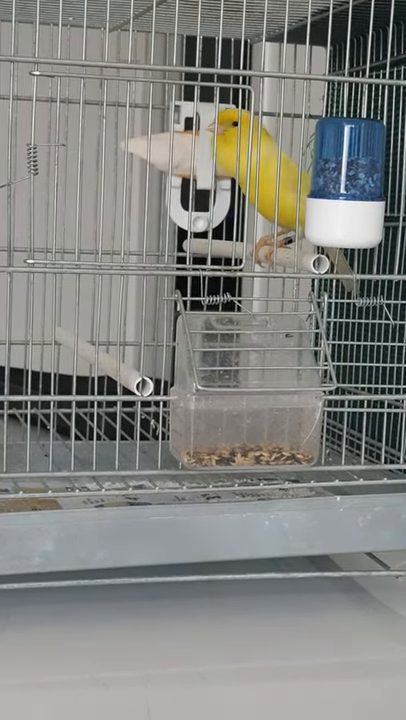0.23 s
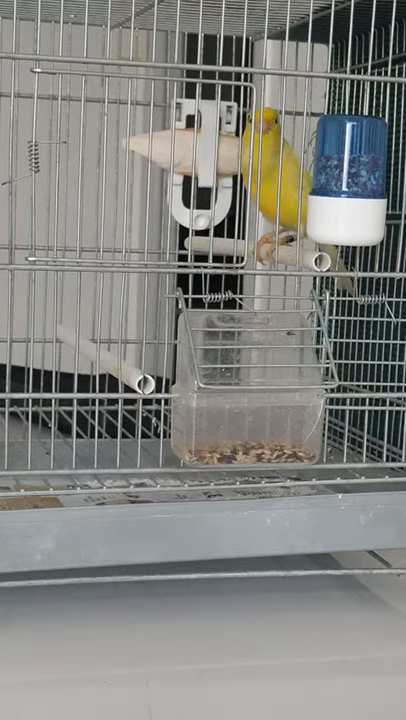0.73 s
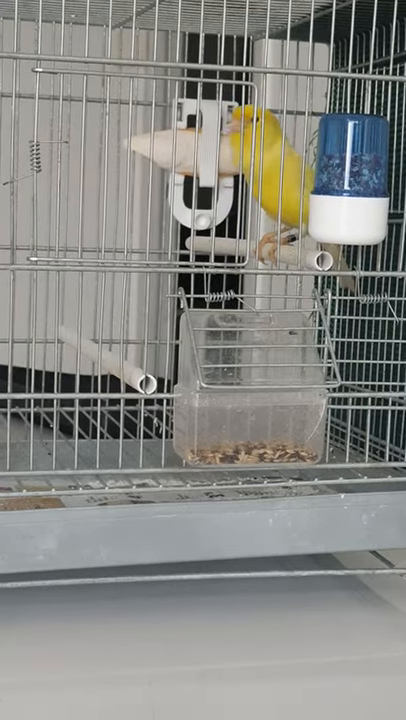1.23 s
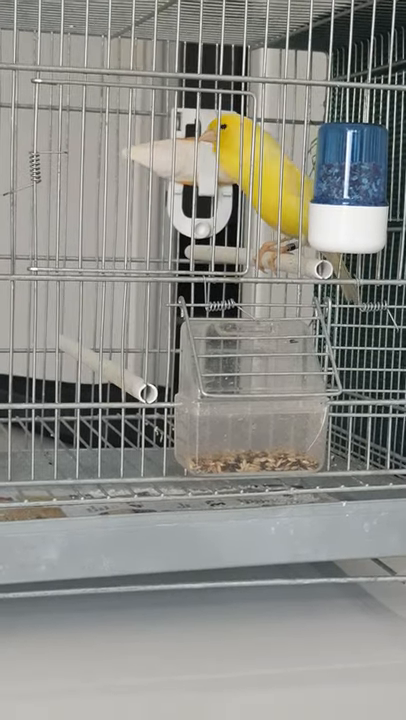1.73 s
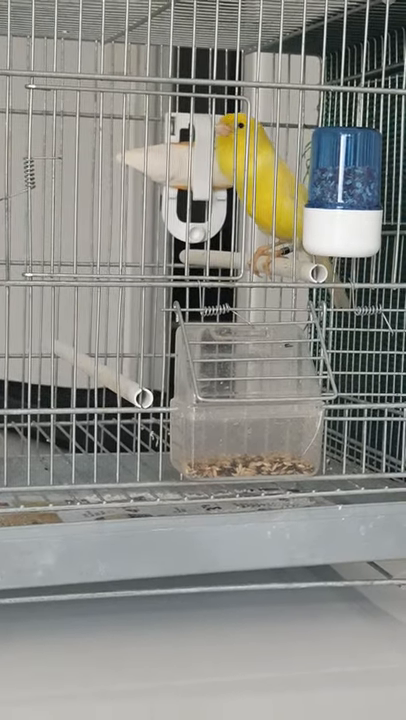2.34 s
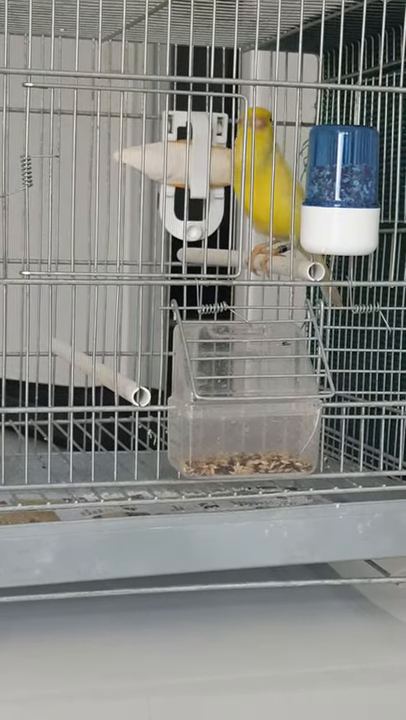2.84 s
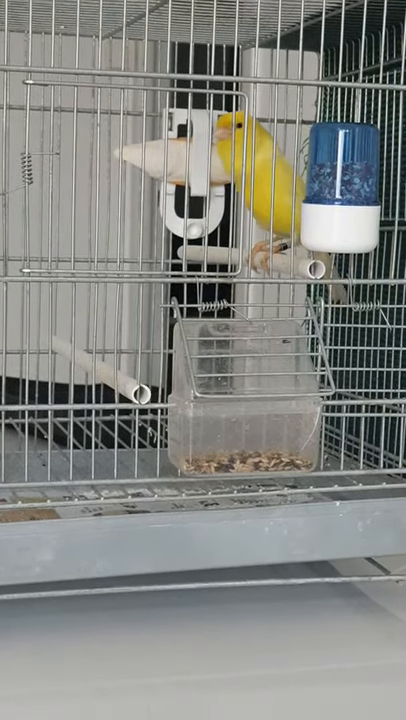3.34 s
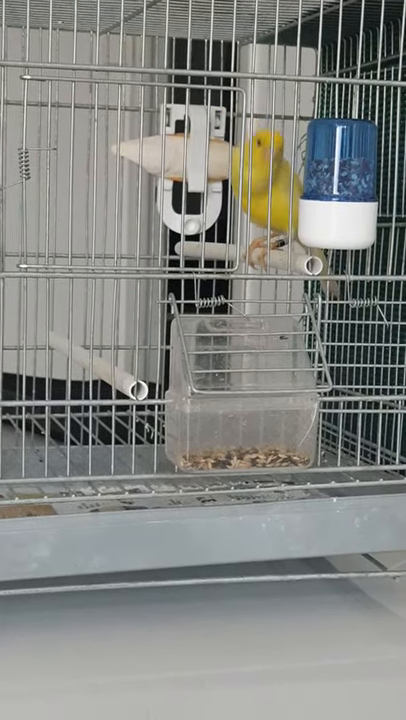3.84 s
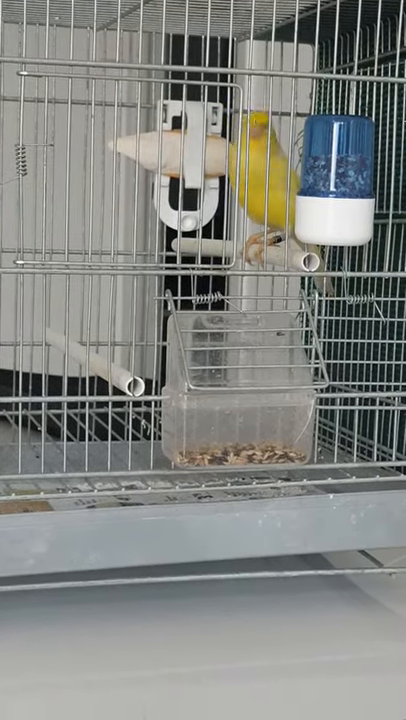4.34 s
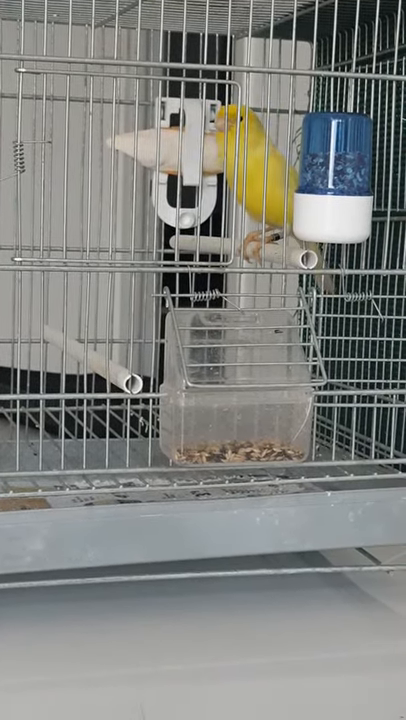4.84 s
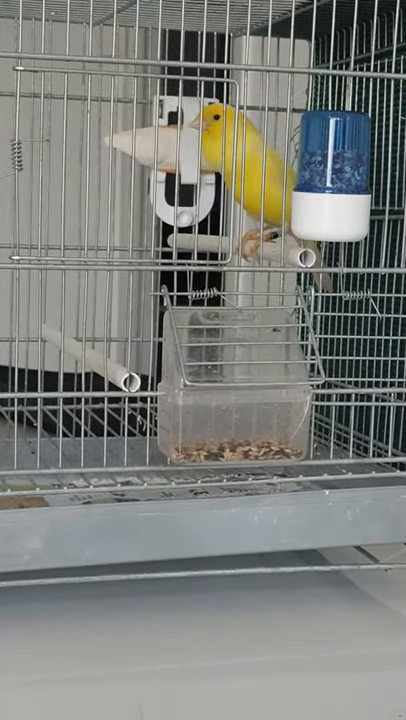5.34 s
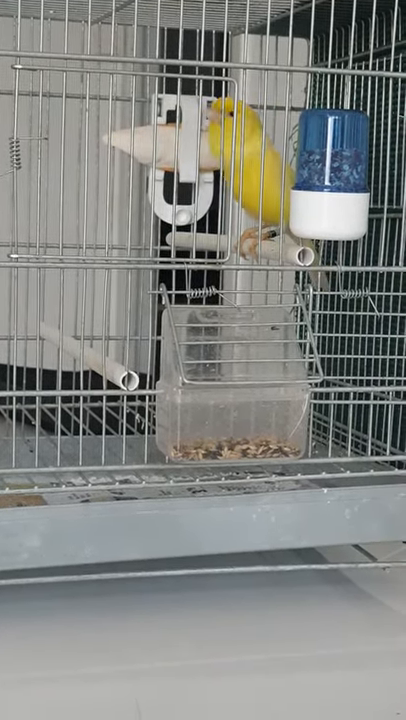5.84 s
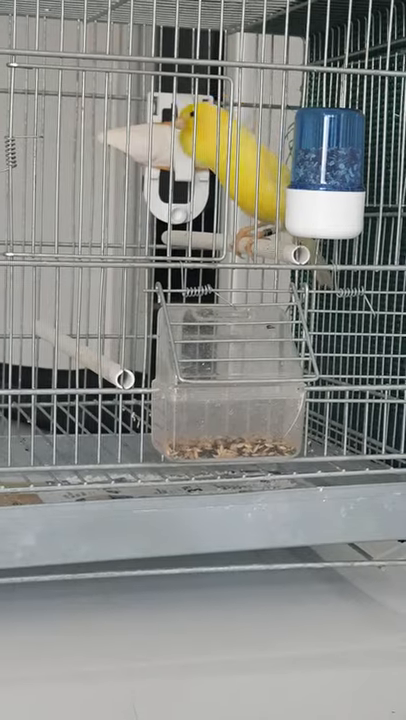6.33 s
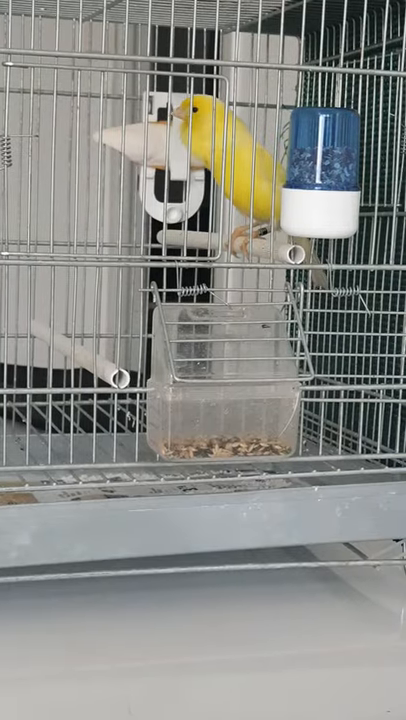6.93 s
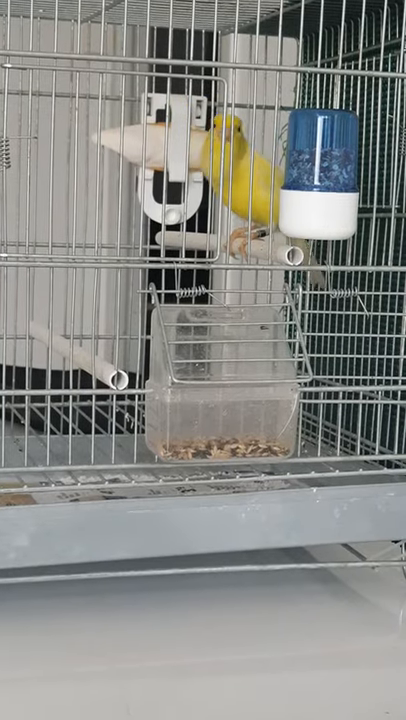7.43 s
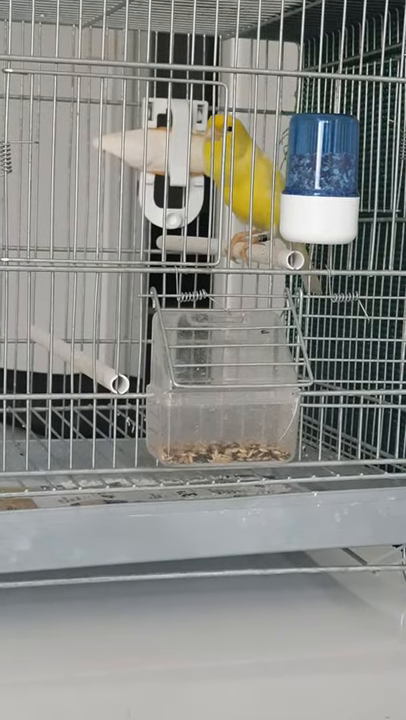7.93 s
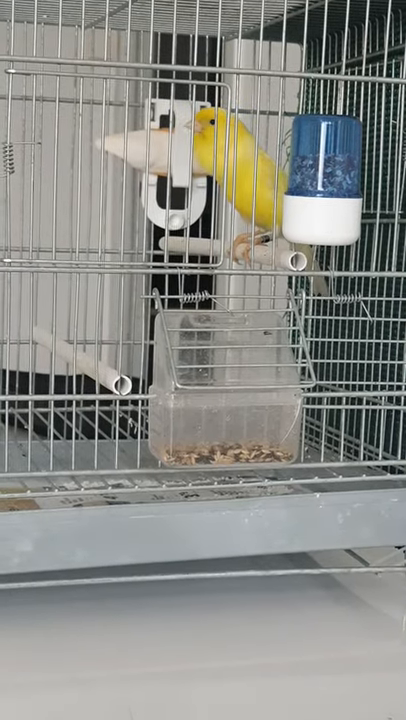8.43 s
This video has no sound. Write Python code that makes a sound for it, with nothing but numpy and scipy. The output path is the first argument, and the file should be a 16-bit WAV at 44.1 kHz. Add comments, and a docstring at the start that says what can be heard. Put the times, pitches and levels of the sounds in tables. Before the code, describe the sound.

A canary sings in a wire cage, close to the microphone in a small hard-walled room. A brief raspy note leads to three loud, sharp chirps, then three falling whistles, each answered by a soft low hoot. A fast roll swells, followed by quieter clucks, a bubbling warble and a long fluttering whistle. A few small cage knocks and faint room air lie beneath.

```python
"""A canary sings in its wire cage in a small hard-walled room, close to a pair of microphones.
One whistling voice, a swept sine with overtones, plays every phrase: a raspy held note, three sharp chirps,
three falling slurs answered by low hoots, a fast roll, clucks, a bubbling warble and a long fluttering whistle.
Small knocks and soft rumbles of filtered noise, still air and a faint hum lie beneath."""
import sys
import numpy as np
from scipy import signal
from scipy.fft import rfft, irfft, next_fast_len
from scipy.io import wavfile
from scipy.ndimage import uniform_filter1d

SR = 44100
rng = np.random.default_rng(int(sys.argv[2]) if len(sys.argv) > 2 else 0)


def pcm_store(signal):
    """Save signal as 16-bit PCM."""
    levels = np.round(np.clip(np.atleast_2d(signal), -1, 1) * 32767)
    wavfile.write(sys.argv[1], SR, levels.astype(np.int16).T)


N = 382788
TIME = np.arange(N) / SR
SIZE = next_fast_len(N + SR)
FREQS = np.maximum(np.arange(SIZE // 2 + 1) * SR / SIZE, 1)


def from_db(db):
    """Decibels to gain."""
    return 10 ** (np.asarray(db) / 20)


def rms_one(x):
    """Scale to unit power."""
    return x / np.sqrt(np.mean(x ** 2) + 1e-20)


def at_hz(points, hz, axis=1):
    """Read one column of a table on a log-frequency axis."""
    table = np.array(points)
    return np.interp(np.log(hz), np.log(table[:, 0]), table[:, axis])


def at_time(points, t):
    """Read a two-column table at the times t."""
    return np.interp(t, *np.transpose(points))


def band(x, low_hz, high_hz):
    """Causal band-pass."""
    sos = signal.butter(2, [low_hz, min(high_hz, .45 * SR)], "band", fs=SR, output="sos")
    return signal.sosfilt(sos, x)


def drift(t, rate_hz):
    """Random wander about zero: normal draws at the given rate, joined by straight lines."""
    steps = (t - t[0]) * rate_hz
    return np.interp(steps, np.arange(4096), rng.standard_normal(4096))


def fade(t, attack_s, release_s):
    """Attack, hold and release, as a gain."""
    return np.clip(np.minimum((t - t[0]) / attack_s, (t[-1] - t) / release_s), 0, 1)


def add(out, t, sound):
    """Mix in a sound that starts at t[0]."""
    start = round(t[0] * SR)
    out[..., start:start + len(t)] += sound[..., :N - start]


def contours(rows):
    """Sample times and smoothly joined columns of rows (time [s], ..)."""
    s, *columns = np.transpose(rows)
    t = np.arange(max(round(s[0] * SR), 0), round(s[-1] * SR)) / SR
    return [t] + [uniform_filter1d(np.interp(t, s, c), size=45) for c in columns]


def beats(beat, count):
    """Times of a trill's syllables: one repeated on a beat that can slow as the bird tires."""
    first_s, period_s, slowing_s = beat
    k = np.arange(count)
    return first_s + period_s * k + slowing_s * k * (k - 1) / 2


# Timbre of each kind of note: overtones 2, 3, .. (level against the fundamental [dB])
OVERTONE_LEVELS = {"chirp": [-25.5, -21], "slur": [-29.5, -31.5, -39.5, -35, -62.5, -38.5], "hoot": [-2, -9,
                   -26.5, -25, -31.5, -23.5, -32], "soft": [1.5, -29.5, -26, -28, -36, -32.5], "low": [-1.2,
                   -15, -34], "roll": [-31.5, -32, -52, -49, -43.5], "purr": [-5, -16, -28.5], "cluck":
                   [-20, -28.5, -32], "pip": [-18, -24, -33.5, -32], "rasp": [-4, -22.5, -24.5, -38.5, -26],
                   "whistle": [-21, -25.5, -33.5, -44, -40.5, -52.5, -46]}
# Fast random wobble of each kind of note: (scale [share of the pitch])
PITCH_JITTER = {"chirp": 0.0048, "slur": 0.0046, "hoot": 0.0071, "soft": 0.0085, "low": 0.027, "roll":
                0.016, "purr": 0.036, "cluck": 0.017, "pip": 0.0408, "rasp": 0.011, "whistle": 0.0093}


def syrinx(t, hz, db, kind, creak=0):
    """A slightly unsteady whistle, as two rows: the fundamental and its overtones."""
    wobble = PITCH_JITTER[kind] * (drift(t, 600) + .6 * drift(t, 90))
    phase = 2 * np.pi * np.cumsum(hz * (1 + wobble)) / SR
    upper = 0
    for k, level_db in enumerate(OVERTONE_LEVELS[kind], 2):
        below_nyquist = k * hz < SR / 2
        upper = upper + from_db(level_db) * np.sin(k * phase) * below_nyquist
    # a creak is irregular period doubling: noisy bands halfway between the harmonics
    upper = upper + creak * sum(drift(t, 600) * np.sin((k + .5) * phase) for k in range(4))
    edge_s = np.minimum(t - t[0], t[-1] - t)
    ends = np.sin(np.pi / 2 * np.clip(edge_s / .0013, 0, 1)) ** 2
    return ends * from_db(db) * np.array([np.sin(phase), upper])


CREAK_DB = -30   # scale of the half-pitch partials that chirps break into as they end


def add_syllable(out, gesture, kind, s, db, hz, length=1, bend=1):
    """Play one syrinx gesture around time s; bend deepens the fall after its highest point."""
    t, ratio, level_db = contours([(s + length * ms / 1000, r, d) for ms, r, d in gesture])
    ratio = ratio ** np.where(t > t[np.argmax(ratio)], bend, 1)
    creak = from_db(CREAK_DB) * np.exp(-((t - s) / .0047) ** 2) if kind == "chirp" else 0
    add(out, t, syrinx(t, hz * ratio, db + level_db, kind, creak))


# Spectrum of the still air: (frequency [Hz], relative level [dB])
AIR_SPECTRUM = [(25, -28), (45, -3.5), (85, -2), (160, -17), (300, -17.5), (600, -25), (1500, -11.5),
                (4000, -31.5), (9500, -37.5), (12000, -30.5), (16000, -36)]
# Low rumbles: (time [s], level [dB], half-width of the swell [s])
RUMBLE_SWELLS = [(1.057, -59.5, 0.057), (1.908, -64, .035), (5.254, -66.5, 0.11), (6.689, -61.5, 0.066)]
AIR_DB, HUM_DB, HUM_HZ = -67.5, -77.5, 50   # levels are RMS


def background():
    """Still air as shaped noise, mains hum and a few soft rumbles; the bass is most alike on both sides."""
    mid, side = rfft(rng.standard_normal((2, SIZE)))
    width = at_hz([(50, 0.3), (200, 0.48), (2000, 1.0)], FREQS)
    stereo = mid + width * side * [[1], [-1]]
    air = irfft(stereo * from_db(at_hz(AIR_SPECTRUM, FREQS)), SIZE)[:, :N]
    swell = sum(from_db(db) * np.exp(-((TIME - s) / length) ** 2) for s, db, length in RUMBLE_SWELLS)
    rumble = swell * rms_one(band(rng.standard_normal(N), 40, 99))
    hum = rms_one(np.sin(2 * np.pi * HUM_HZ * TIME))
    return from_db(AIR_DB) * rms_one(air) + rumble + from_db(HUM_DB) * hum


# Held notes that open and close the song: (start [s], end [s])
HELD_TIMES = {"rasp": (0, .135), "whistle": (7.446, 8.69)}
# Their shapes: (pitch [Hz], level [dB], scoop [share of the pitch], sag [Hz], swell [dB])
HELD_SHAPES = {"rasp": (1860, -41, .06, 0, 2.5), "whistle": (1965, -40.5, 0.23, 125, 5.5)}
SCOOP_S, SAG_POWER = .02, 2.4   # time to scoop up; a power above 1 sags ever faster
FLUTTER_HZ, FLUTTER_DIP, FLUTTER_DB = 29.28, .24, 12   # mean rate, pitch share and level dip per unit catch
FLUTTER_START, FLUTTER_END = 1, .12   # depth, dying away over the note


def held_notes(waver_db=2.5, attack_s=.012, release_s=.01):
    """A raspy and a clear held note; pitch and loudness waver and dip together in brief, uneven catches."""
    out = np.zeros((2, N))
    for kind, (start, end) in HELD_TIMES.items():
        hz, db, scoop, sag_hz, swell_db = HELD_SHAPES[kind]
        age = TIME[:round((end - start) * SR)]
        progress = age / age[-1]
        depth = FLUTTER_START + (FLUTTER_END - FLUTTER_START) * progress
        cycle = np.cumsum(FLUTTER_HZ * (1 + .3 * drift(age, 30))) / SR
        pulse = np.abs(np.sin(np.pi * cycle)) ** 30   # one narrow peak per cycle
        catch = depth * pulse * np.abs(.8 + .5 * drift(age, 30))
        waver = drift(age, 70)   # air pressure lifts pitch and loudness together
        pitch = hz * (1 - scoop * np.exp(-age / SCOOP_S)) - sag_hz * progress ** SAG_POWER
        pitch = pitch * (1 - FLUTTER_DIP * catch + .012 * depth * waver)
        level_db = db + swell_db * progress - FLUTTER_DB * catch + waver_db * waver
        note = syrinx(age, pitch, level_db, kind)
        add(out, start + age, fade(age, attack_s, release_s) * note)
    return out


# Room tail: (frequency [Hz], decay time t60 [s], level [dB])
TAIL_BANDS = [(405, 0.13, -2), (899, 0.44, -5), (1522, 0.45, 1), (2310, 0.53, -6), (4170, 0.45, -2),
              (8600, 0.14, -3.5), (14800, 0.35, -7)]
TAIL_LIKENESS = .043   # share of the noise power common to both sides


def room_tail():
    """Dense reflections, each band dying at its own rate; the two sides are partly alike."""
    age, out = TIME[:SR * 3 // 4], 0
    edges = np.geomspace(200, 18000, 14)
    build_up = np.clip((age - .004) / .012, 0, 1)
    for low, high in zip(edges, edges[1:]):
        hz = np.sqrt(low * high)
        common = np.sqrt(TAIL_LIKENESS) * rng.standard_normal(len(age))
        noise = common + np.sqrt(1 - TAIL_LIKENESS) * rng.standard_normal((2, len(age)))
        decay = from_db(-60 * age / at_hz(TAIL_BANDS, hz)) * build_up
        decay = decay / np.sqrt(np.sum(decay ** 2))
        out = out + band(noise, low, high) * decay * from_db(at_hz(TAIL_BANDS, hz, axis=2))
    return out


# Stereo balance of the direct sound: (frequency [Hz], left minus right [dB])
STEREO_BALANCE = [(500, 2), (950, -5), (1450, -4.5), (1900, -3.5), (2400, 9), (4400, 6), (5800, -6),
                  (8500, -6.5), (13000, -7.5)]
# First reflections: (delay [ms], level left [dB], level right [dB])
PANEL_ECHOES = [(6.7, -10, -4), (16.5, -24, -22)]
RIGHT_LAG_MS, PANEL_HZ = .15, 1300


def room(direct, radiated, tail_balance=0.7):
    """Direct sound, panel echoes and tail; the bird is nearer to the left microphone."""
    lean_db = at_hz(STEREO_BALANCE, FREQS) * np.array([[.5], [-.5]])
    turn_per_ms = -2j * np.pi * FREQS / 1000   # phase turn of a delay
    reflected = from_db(tail_balance * lean_db) * rfft(room_tail(), SIZE)
    panel = 1 / (1 + (PANEL_HZ / FREQS) ** 4)   # small panels mirror only short waves
    for ms, left_db, right_db in PANEL_ECHOES:
        reflected += panel * from_db([[left_db], [right_db]]) * np.exp(turn_per_ms * ms)
    heard = rfft(direct, SIZE) * from_db(lean_db) + rfft(radiated, SIZE) * reflected
    heard[1] *= np.exp(turn_per_ms * RIGHT_LAG_MS)
    return irfft(heard, SIZE)[:, :N]


# Syrinx gestures, all around the syllable's time: (time [ms], pitch [ratio], level [dB])
LEAD_IN_GESTURE = [(-34, .86, -45), (-31, .92, -16), (-28.5, .92, -24), (-26, .9, -48)]
CHIRP_GESTURE = [(-21, .95, -20), (-16, 1.005, -7), (-8, .99, -1), (-1.5, .98, 0), (.7, .93, -6),
                 (3.5, .86, -19), (6, .82, -45)]
# Chirps: (time [s], level [dB], pitch [Hz], depth of the pitch bend [exponent])
CHIRP_NOTES = [(.2, -10, 4395, 1.05), (.577, -9.5, 4554, 1.16), (0.967, -12, 4755, 1.94)]


def chirps():
    """Sharp high chirps: a faint lead-in, then a loud note whose pitch falls as it ends."""
    out = np.zeros((2, N))
    for s, db, hz, bend in CHIRP_NOTES:
        add_syllable(out, LEAD_IN_GESTURE, "chirp", s, db, hz)
        add_syllable(out, CHIRP_GESTURE, "chirp", s, db, hz, bend=bend)
    return out


# Soft low notes after each chirp, and a short low purr that closes the roll:
# (start [s], length [s], pitch [Hz], level [dB])
SOFT_LOW_NOTES = [(0.224, 0.29, 1407, -51), (0.608, 0.24, 1406, -54), (0.995, .32, 1419, -51),
                  (3.746, 0.018, 782, -45)]
SOFT_ARCH, SOFT_ATTACK_S, SOFT_RELEASE_S = .025, .0079, .016   # arch as a share of the pitch


def soft_notes():
    """Soft low notes after each chirp and a short purr closing the roll; each pitch makes a shallow arch."""
    out = np.zeros((2, N))
    for s, length, hz, db in SOFT_LOW_NOTES:
        age = TIME[:round(length * SR)]
        arch = 1 + SOFT_ARCH * np.sin(np.pi * age / length)
        note = syrinx(age, hz * arch, db, "soft")
        add(out, s + age, fade(age, SOFT_ATTACK_S, SOFT_RELEASE_S) * note)
    return out


# Small knocks: (time [s], starting level of the thud [dB], starting level of the tick [dB])
CAGE_KNOCKS = [(1.169, -50, -94), (1.885, -41, -51.5), (3.73, -66, -61.5)]


def cage(thud_t60=0.012, tick_t60=0.021):
    """Small knocks as decaying noise bands: a dull thud and a brief rattle of the wires."""
    out, age = np.zeros(N), TIME[:SR // 4]
    for s, thud_db, tick_db in CAGE_KNOCKS:
        thud, tick = rng.standard_normal((2, len(age)))
        add(out, s + age, rms_one(band(thud, 170, 1900)) * from_db(thud_db - 60 * age / thud_t60))
        add(out, s + age, rms_one(band(tick, 2000, 14000)) * from_db(tick_db - 60 * age / tick_t60))
    return out


# Falling gesture: (time [ms], pitch [ratio], level [dB])
SLUR_GESTURE = [(-190, 1.48, -33), (-160, 1.36, -20.5), (-135, 1.28, -11), (-95.5, 1.22, -4),
                (-54.5, 1.13, 2), (-24.5, 1.04, 1.5), (-4, 1, -4), (1.5, 0.81, -17.5), (8, .7, -52.5)]
# Slurs: (time [s], level [dB], pitch [Hz], length [ratio])
SLUR_NOTES = [(1.524, -22.5, 2059, 0.96), (1.993, -21, 2123, .84), (2.487, -22.5, 2088, .82)]


def slurs():
    """Whistles that swell while their pitch slides down."""
    out = np.zeros((2, N))
    for s, db, hz, length in SLUR_NOTES:
        add_syllable(out, SLUR_GESTURE, "slur", s, db, hz, length)
    return out


# Low gesture: (time [ms], pitch [ratio], level [dB])
HOOT_GESTURE = [(-4.5, 3.3, -9.5), (1.5, .85, -13), (14.5, .72, -15.5), (32, .9, -4), (55.5, 1, -3.5),
                (103.5, 1.02, -2), (165, .97, -0.5), (183, .88, -2.5), (195.5, 0.737, -23)]
# Hoots: (time [s], level [dB], pitch [Hz], length [ratio])
HOOT_NOTES = [(1.564, -41, 979, 1.03), (2.042, -41, 951.4, 1.05), (2.533, -41.5, 946, 1.1)]


def hoots():
    """Low notes rich in overtones that answer the slurs."""
    out = np.zeros((2, N))
    for s, db, hz, length in HOOT_NOTES:
        add_syllable(out, HOOT_GESTURE, "hoot", s, db, hz, length)
    return out


# Rough low and bright high gesture: (time [ms], pitch [ratio], level [dB])
PURR_GESTURE = [(-22, .92, -22), (-19, 1.02, 1), (-14, 1.08, 1.5), (-12.3, 1.4, -7), (-10.5, 1.7, -1),
                (-8, 1.95, -6), (-5, 2.6, -20)]
FLICK_GESTURE = [(-4, 1.08, -30), (-1.8, 1.05, -10), (-.3, 1.01, 1.5), (.5, .97, 1), (1.8, .89, -11),
                 (4, .65, -28)]
# The roll swells with the bird's effort: (time [s], level of the flicks [dB])
FLICK_LEVELS = [(2.888, -48), (2.925, -35.5), (3.0, -31.5), (3.2, -26), (3.5, -22.5), (3.72, -24)]
# Beat: (first syllable [s], first period [s], lengthening per syllable [s])
ROLL_TIMING = (2.888, .03706, .000268)
# flicks start flat, settle quickly, then creep upward; purrs start faint
ROLL_HZ, ROLL_FLAT_HZ, ROLL_CREEP_HZ_PER_S, ROLL_SETTLE_S = 2212, 634, 310, .087
PURR_HZ, PURR_DB, PURR_FAINT_DB = 857.5, -44, 15.5


def roll(spread_db=1.1, pitch_spread=0.017, purr_spread=0.0602):
    """A fast roll: on every beat a rough low purr leaps up to a bright flick."""
    out = np.zeros((2, N))
    times = beats(ROLL_TIMING, count=22)
    for s, (loud, sharp, lift, stretch) in zip(times, rng.standard_normal((len(times), 4))):
        age = s - times[0]
        unsettled = np.exp(-age / ROLL_SETTLE_S)
        flick_hz = ROLL_HZ - ROLL_FLAT_HZ * unsettled + ROLL_CREEP_HZ_PER_S * age
        flick_hz *= 1 + pitch_spread * sharp
        flick_db = at_time(FLICK_LEVELS, s) + spread_db * loud
        purr_hz = PURR_HZ * (1 + pitch_spread * lift)
        purr_db = PURR_DB - PURR_FAINT_DB * unsettled
        add_syllable(out, PURR_GESTURE, "purr", s, purr_db, purr_hz, 1 + purr_spread * stretch)
        add_syllable(out, FLICK_GESTURE, "roll", s, flick_db, flick_hz)
    return out


# Short held gesture and its closing drop: (time [ms], pitch [ratio], level [dB])
CLUCK_GESTURE = [(-44, 1.3, -27.5), (-22.5, .98, -3.5), (-7, 1, 2.5), (-1.5, 1.073, 1.5), (-1.5, 0.88, 2.5),
                 (1.5, 0.55, -8.5)]
DROP_GESTURE = [(-2, 2.1, -20), (0, 1.7, -2), (2.5, 1.25, -1), (6, 1, 0), (12, .88, -3), (23, .82, -10),
                (38, .8, -28)]
# Single clucks, before they run together: (time [s], level [dB], pitch [Hz])
SINGLE_CLUCKS = [(3.947, -42.5, 1677), (4.084, -41.5, 1635), (4.515, -46.5, 1669), (4.648, -46.5, 1638),
                 (4.798, -49.5, 1671), (4.946, -42.5, 1656), (5.09, -44, 1638), (5.186, -43.5, 1680)]
# Beat of the run: (first syllable [s], first period [s], lengthening per syllable [s])
CLUCK_TIMING = (5.273, .08175, .001324)
CLUCK_DB, CLUCK_HZ = -44, 1752   # the run is even
DROP_DB, DROP_HZ, DROP_FOLLOWS = -50.5, 794, .24   # each drop follows its cluck's strength [dB per dB]


def clucks(spread_db=0.4, pitch_spread=0.009, drop_spread=0.06):
    """Clucks, first single, then in a run: a short held note that drops into the low register."""
    out = np.zeros((2, N))
    times = beats(CLUCK_TIMING, count=11)
    run = [(s, CLUCK_DB + spread_db * loud, CLUCK_HZ * (1 + pitch_spread * sharp))
           for s, (loud, sharp) in zip(times, rng.standard_normal((len(times), 2)))]
    for s, db, hz in list(SINGLE_CLUCKS) + run:
        lift, stretch = np.exp(drop_spread * rng.standard_normal(2))   # no two drops land alike
        drop_db = DROP_DB + DROP_FOLLOWS * (db - CLUCK_DB)
        add_syllable(out, CLUCK_GESTURE, "cluck", s, db, hz)
        add_syllable(out, DROP_GESTURE, "low", s, drop_db, DROP_HZ * lift, stretch)
    return out


# Low upward sweep and its closing pip: (time [ms], pitch [ratio], level [dB])
BUBBLE_GESTURE = [(-23, .95, -24), (-21, .98, -6), (-7, 1.03, -2), (0, 1.3, -7), (3.5, 2, -4),
                  (5.5, 2.5, -16)]
PIP_GESTURE = [(2, 1.5, -45), (5.4, 1.8, -5), (8.2, 1.6, -16), (9.8, .88, 1), (14, 1.015, 3), (21, .98, 2),
               (30, .84, -15)]
# The pitch sags, then lifts towards the last whistle: (time [s], pitch of the pips [Hz])
PIP_PITCHES = [(6.24, 1402), (6.58, 1365), (6.75, 1432), (6.96, 1362), (7.1, 1231), (7.2, 1475),
               (7.38, 1521)]
# Steady beat: (first syllable [s], first period [s], lengthening per syllable [s])
WARBLE_TIMING = (6.236, .081, 0)
BUBBLE_HZ, BUBBLE_DB, PIP_DB = 761.5, -45, -41
WARBLE_FAINT_DB, WARBLE_SETTLE_S = 5, .17   # it fades in to a steady level


def warble(spread_db=0.95, pitch_spread=0.03):
    """A bubbling warble: on every beat a low bubble sweeps up and ends in a pip."""
    out = np.zeros((2, N))
    times = beats(WARBLE_TIMING, count=15)
    for s, (loud, sharp) in zip(times, rng.standard_normal((len(times), 2))):
        faint_db = WARBLE_FAINT_DB * np.exp(-(s - times[0]) / WARBLE_SETTLE_S)
        lift = 1 + pitch_spread * sharp
        pip_db = PIP_DB - faint_db + spread_db * loud
        add_syllable(out, BUBBLE_GESTURE, "low", s, BUBBLE_DB - faint_db, BUBBLE_HZ * lift)
        add_syllable(out, PIP_GESTURE, "pip", s, pip_db, at_time(PIP_PITCHES, s) * lift)
    return out


# Throat and beak colour the overtones: (frequency [Hz], gain [dB])
BEAK_COLOUR = [(3000, 1.5), (4400, 2), (5200, -10), (5800, 1), (6300, -3), (7300, -3), (9000, 2),
               (10300, 1.5), (12000, 2)]
# The bird shifts on its perch and turns its head: (time [s], left minus right [dB])
HEAD_TURNS = [(.5, 0.7), (1.5, -1.2), (3.5, -1), (5.5, 0), (6.6, 0), (7.7, 0.3)]
VOICE_TRIM_DB, OFF_AXIS_DB = -1.5, -5.5   # whole voice; overtones in the direct sound


def scene():
    """The beak beams the overtones past the microphones, so they arrive largely by way of the walls."""
    song = held_notes() + chirps() + soft_notes() + slurs() + hoots() + roll() + clucks() + warble()
    tone, overtones = from_db(VOICE_TRIM_DB) * song
    overtones = irfft(rfft(overtones, SIZE) * from_db(at_hz(BEAK_COLOUR, FREQS)), SIZE)[:N]
    plain = tone + cage()
    facing = from_db(at_time(HEAD_TURNS, TIME) * np.array([[.5], [-.5]]))
    direct = plain + from_db(OFF_AXIS_DB) * overtones
    return facing * room(direct, plain + overtones) + background()


CUTOFF_HZ = 15800


def record(dry):
    """The top is cut steeply by an elliptic low-pass."""
    return signal.sosfilt(signal.ellip(10, .1, 80, CUTOFF_HZ, fs=SR, output="sos"), dry)


dry = scene()
out = record(dry)
pcm_store(out)
```